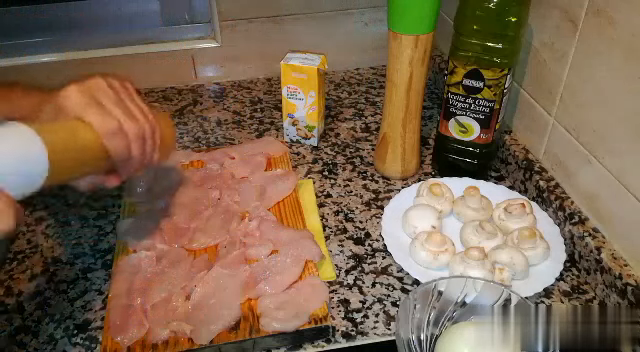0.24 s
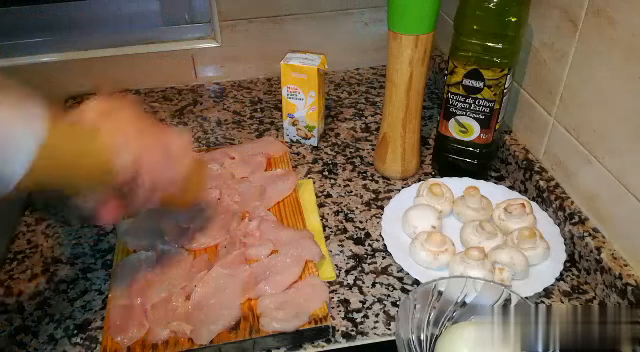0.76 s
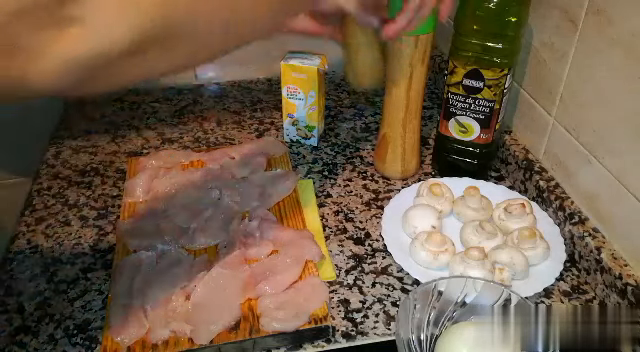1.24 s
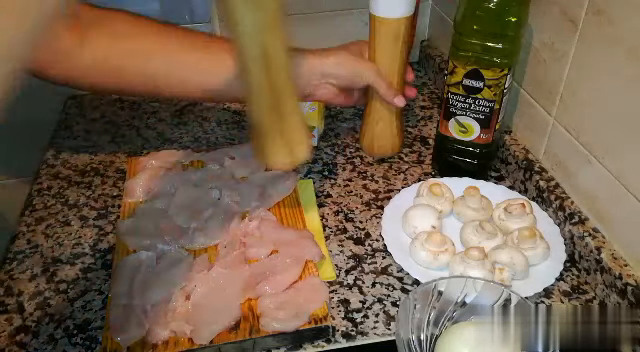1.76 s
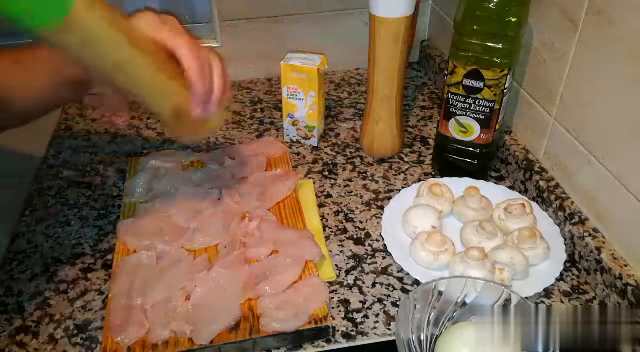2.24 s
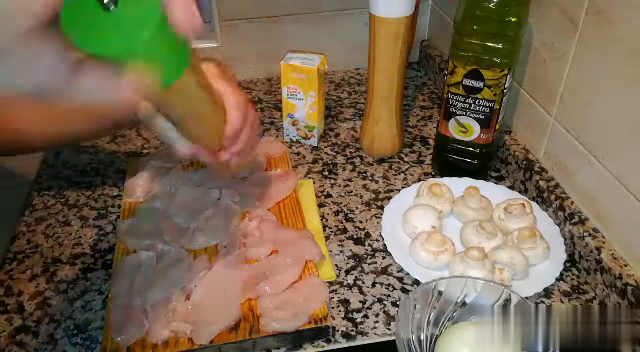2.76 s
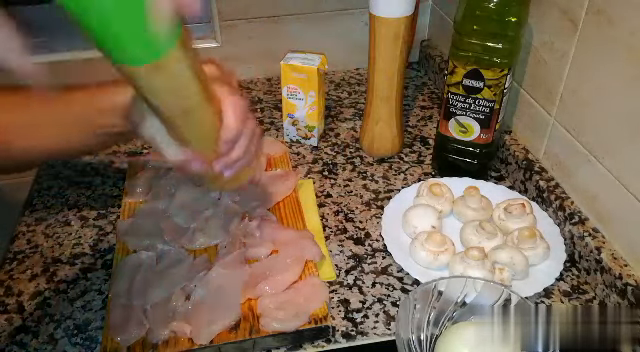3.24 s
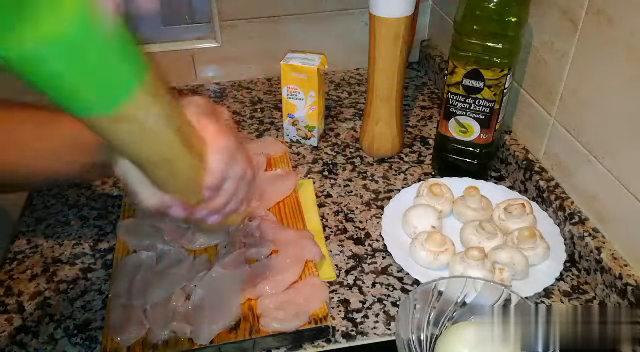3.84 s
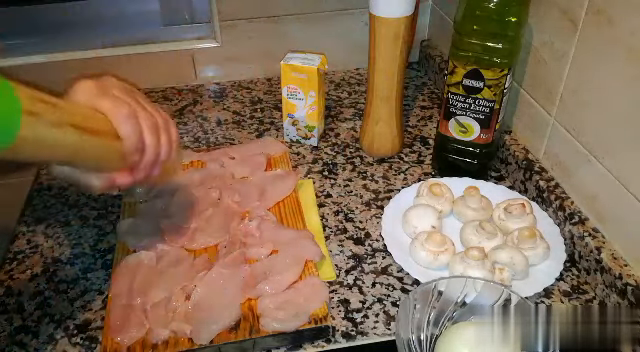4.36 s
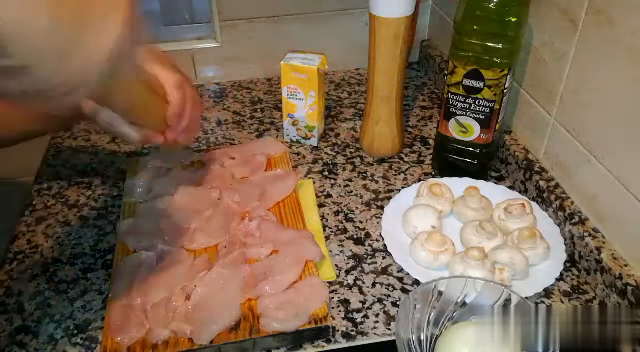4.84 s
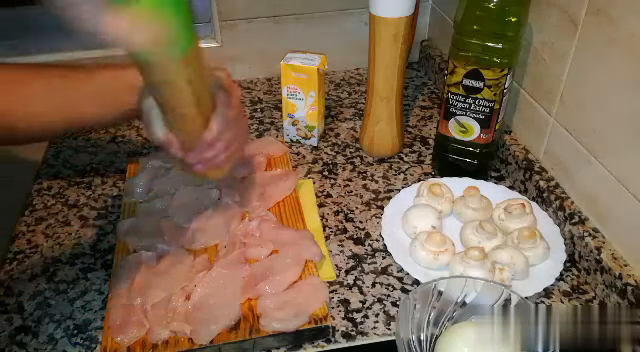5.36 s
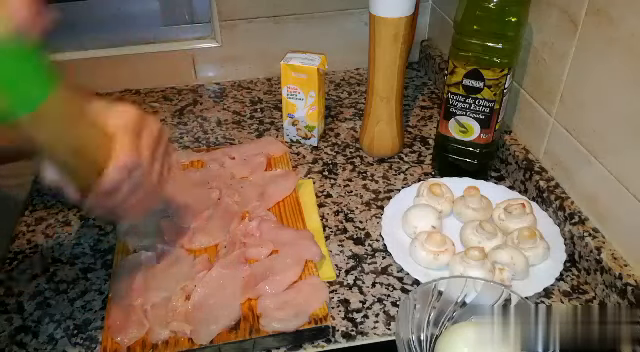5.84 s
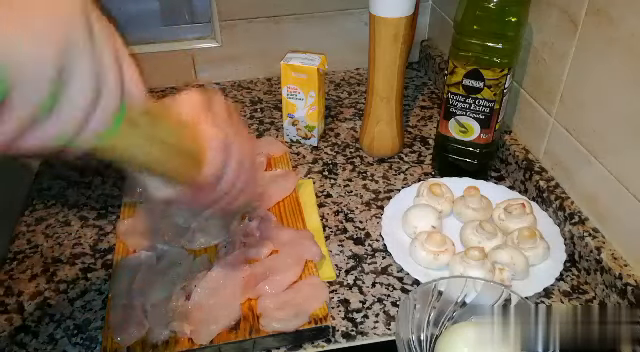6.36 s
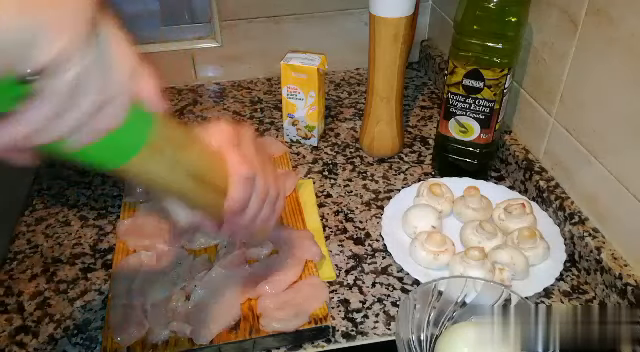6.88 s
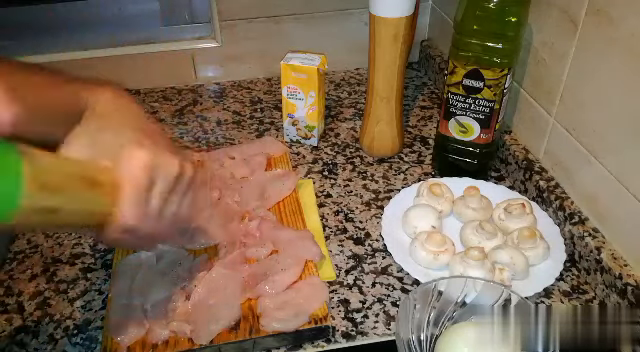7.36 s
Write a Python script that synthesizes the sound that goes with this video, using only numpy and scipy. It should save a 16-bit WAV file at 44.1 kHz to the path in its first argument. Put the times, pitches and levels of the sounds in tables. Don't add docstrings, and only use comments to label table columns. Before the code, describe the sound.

A small tiled kitchen recorded close by a phone, in stereo, with a very faint low refrigerator hum and quiet air. At 0.1 s a wooden salt mill makes a soft, fine crunch, with a weaker one at 0.3 s; from 0.53 to 0.7 s it turns back with sparse grains, a sharp woody crack and a slight ring. Quiet follows until 1.6 s, when its foot lands on stone with a loud, dull, quickly damped wooden knock and low shudder. Near 2.3 s a palm slides with a tiny hiss, then the pepper mill crunches strongly until 2.6 s. A weak twist at 3.0 s precedes brittle bursts around 3.45, 3.6, 4.0, 4.7, 5.1, 5.5, 5.9 and 6.35 s, the strongest around 5 to 6 s. Loose cap clicks and dry rasps punctuate them, notably at 3.55, 4.15, 5.47 and 6.8 to 7.1 s. A final crunch begins at 7.5 s.

```python
import sys
import numpy as np
from scipy import signal
from scipy.fft import rfft, irfft, next_fast_len
from scipy.io import wavfile
from scipy.ndimage import uniform_filter1d, map_coordinates

SR = 44100
rng = np.random.default_rng(int(sys.argv[2]) if len(sys.argv) > 2 else 0)


def master_out(mix):
    frames = np.transpose(np.atleast_2d(mix))
    ceiling = np.clip(frames, -1, 1)
    pcm = np.round(ceiling * 32767).astype(np.int16)
    wavfile.write(sys.argv[1], SR, pcm)


def voltage_ratio(level):
    return 10 ** (np.asarray(level, float) / 20)


N = 335683


def unit(x):
    return x / np.sqrt(np.mean(x ** 2) + 1e-20)


def along(points, hz):
    f, v = np.transpose(points)
    return np.interp(np.log(hz + 1), np.log(f + 1), v)


def add(line, s, piece):
    spot = line[..., round(s * SR):][..., :piece.shape[-1]]
    spot += piece[..., :spot.shape[-1]]


def filtered(x, response):
    m = next_fast_len(x.shape[-1] + SR // 2)
    spectrum = rfft(x, m) * response(np.fft.rfftfreq(m, 1 / SR))
    return irfft(spectrum, m)[..., :x.shape[-1]]


def ringing(x, body, order):
    def shape(f):
        total = 0
        for k, (center_hz, width_hz, db) in enumerate(body):
            damping = 1j * f * width_hz
            mode = damping / (center_hz * center_hz - f * f + damping)
            total = total + (-1) ** k * voltage_ratio(db) * mode ** order
        return total

    power = np.mean(np.abs(shape(np.linspace(1, SR / 2, 4000))) ** 2)
    return filtered(x, shape) / np.sqrt(power)


# frequency in Hz, level in dB rms.
HUM = [(50, -88), (100, -79.5), (120, -77.5), (185, -84), (15353, -103.5)]
# frequency in Hz, level in dB per Hz.
AIR = [(15, -53), (25, -12.5), (64, -20), (107, 0.5), (148, -20), (857, -19), (4210, -29.5), (15800, -51.5)]
# frequency in Hz, left-right likeness (1 = same).
ALIKE = [(60, 0.92), (180, 0.95), (550, 0.19), (1650, 0.077), (4970, 0.41), (15000, -0.12)]


def fridge():
    air_db = -71
    t = np.arange(N) / SR

    def sway(rate_hz):
        return map_coordinates(rng.standard_normal(int(N * rate_hz / SR) + 4), [t * rate_hz])

    lines = np.zeros(N)
    for hz, db in HUM:
        lines += voltage_ratio(db + 3 + 2.2 * sway(7)) * np.sin(2 * np.pi * hz * t + .7 * sway(6))

    def mid_side(hz):
        turn = np.arccos(np.clip(along(ALIKE, hz), -1, 1)) / 2
        return voltage_ratio(along(AIR, hz)) * np.array([np.cos(turn), np.sin(turn)])

    mid, side = filtered(rng.standard_normal((2, N)), mid_side)
    air = np.array([mid + side, mid - side])
    above_bass = filtered(air, lambda hz: hz > 250)
    return lines + voltage_ratio(air_db + 1.4 * sway(4.5)) * air / np.std(above_bass)


# frequency in Hz, level in dB per Hz.
FIZZ = [(5000, -46), (7500, 0), (9000, 1.5), (12000, -4), (15400, -10.5), (16000, -32.5), (16500, -73)]


def sparkle(x):
    return filtered(x, lambda hz: voltage_ratio(along(FIZZ, hz) + 6.5))


BITE_S = [.009, .022, .03, .016]


def strokes(twists, layers):
    usual_db, climb_db, fade_db, fade_bend, let_go = -30, 15.5, 23, 1.44, 1.25
    power = np.zeros((4, N))
    over_db, per_effort, per_slip = np.transpose(layers)[..., None]
    for s, climb_s, fade_s, peak_db, slip_db in twists:
        t = np.arange(round((climb_s + let_go * fade_s) * SR)) / SR
        climb = climb_db * np.clip(1 - t / climb_s, 0, 1)
        sag = fade_db * np.clip((t - climb_s) / fade_s, 0, None) ** fade_bend
        effort_db = peak_db - climb - sag
        level_db = usual_db + over_db + per_effort * (effort_db - usual_db) + per_slip * slip_db
        bite = np.clip(t / np.c_[BITE_S], 0, 1) ** 2
        add(power, s, (voltage_ratio(level_db) * bite) ** 2)
    return np.sqrt(power)


def grit(per_s, spread_db, life_s):
    chance, size = rng.random((2, N))
    size_db = -spread_db * np.log(size + 1e-9).clip(-3.2)
    starts = (chance < per_s / SR) * voltage_ratio(size_db)
    return unit(signal.lfilter([1], [1, -voltage_ratio(-60 / (life_s * SR))], starts))


# frequency in Hz, width in Hz, level in dB.
HANDLE = [(120, 67, -7.5), (200, 110, -9), (320, 80, -2), (408, 62, 0), (513, 71, 3), (650, 160, -0.5)]


def mill(twists, layers, cracks, body, burr, per_s, spread_db, life_s, rasp_db):
    rasp_db_per_octave = 7
    crush, rasp, fizz, knock = strokes(twists, layers) * grit(per_s, spread_db, life_s)
    own, kick = np.zeros((2, N))
    t = np.arange(SR // 25) / SR
    give = 1 - np.exp(-(t / .0012) ** 2)
    for s, db, hz in cracks:
        burr_db = db + rasp_db + rasp_db_per_octave * np.log2(hz / 2000)
        note = np.sin(2 * np.pi * hz * t)
        add(crush, s, give * voltage_ratio(db + 1.5 - 60 * t / 0.0073))
        add(kick, s + .0012, voltage_ratio(db - 3.0) * np.array([1, -1]))
        add(rasp, s, give * voltage_ratio(burr_db - 60 * t / 0.012))
        add(own, s, give * voltage_ratio(db + 2.5 - 60 * t / 0.012) * note)
    crush, rasp, fizz, knock = [crush, rasp, fizz, knock] * rng.standard_normal((4, N))
    wood = own + ringing(crush + kick, body, order=2)
    wood = filtered(wood, lambda f: 1 / (1 + 1j * f / 6000) ** 2)
    metal = filtered(ringing(rasp, burr, order=2), lambda f: 1 / (1 + 1j * f / 11000) ** 2)
    return wood + metal + sparkle(fizz) + ringing(knock, HANDLE, order=2)


# start in s, climb in s, fade in s, peak effort in dB,
# slip in dB (burrs rubbing with little to crush).
SALT_TWISTS = [
    (.096, 0.062, 0.099, -33, -0.6),
    (.308, 0.013, 0.063, -46.5, -4),
]
# dB over usual effort, dB per dB of effort, dB per dB of slip.
SALT_LAYERS = [
    (2.55, 1.01, 0),
    (-5, 0.95, 1.32),
    (-18, 0.88, 1.4),
    (-18.5, 1.1, -2),
]
# start in s, peak in dB, pitch in Hz.
SALT_CRACKS = [(0.108, -37.5, 3040), (0.128, -23, 1650), (0.138, -48.5, 3100), (0.169, -34, 3020),
               (0.189, -43, 2640), (0.209, -48, 2140), (0.344, -33, 1810)]
# frequency in Hz, width in Hz, level in dB.
SALT_BODY = [(1390, 1200, -3), (2245, 470, 4.5), (2960, 1020, 3), (4460, 1200, -2)]
# frequency in Hz, width in Hz, level in dB.
SALT_BURR = [(3880, 1700, 0.5), (5030, 4100, -1.5), (6430, 2200, 3), (7350, 1700, -30)]


def salt_mill():
    return mill(SALT_TWISTS, SALT_LAYERS, SALT_CRACKS, SALT_BODY, SALT_BURR,
                per_s=1900.0, spread_db=1.5, life_s=.03, rasp_db=-20)


# start in s, peak in dB, t60 in s, sparkle in dB over peak.
CAP_CLICKS = [(0.3132, -44, 0.042, -18), (3.537, -24, 0.015, -14), (3.5555, -14.5, 0.013, -18),
              (3.6635, -28, 0.027, -48), (4.1421, -12, 0.021, -14), (4.188, -15.5, 0.024, -11.5),
              (4.2883, -27.5, 0.02, -18), (5.4709, -9.5, 0.011, -21), (6.6671, -62, 0.022, -19.5),
              (6.788, -58, 0.024, -34), (6.8246, -20, 0.0064, -44), (6.846, -18.5, 0.007, -18),
              (6.9339, -24, 0.024, -19), (7.068, -20.5, 0.013, -29)]
# frequency in Hz, width in Hz, level in dB.
CAP = [(1810, 940, -1), (3090, 480, 3.5), (4600, 890, -1.5), (5320, 1600, -1.5), (6900, 1300, -5.5)]


def cap():
    blows = np.zeros((2, N))
    t = np.arange(SR // 20) / SR
    for s, db, t60_s, top_db in CAP_CLICKS:
        peaks_db = np.array([[db - 1.5], [db + top_db - 2]])
        add(blows, s, voltage_ratio(peaks_db - 60 * t / np.clip(t60_s, .003, .08)))
    low, high = blows * rng.standard_normal((2, N))
    return ringing(low, CAP, order=1) + sparkle(high)


# start in s, climb in s, fade in s, peak effort in dB, slip in dB.
SALT_RETURN = [
    (.53, 0.071, 0.032, -40.5, 5),
    (.606, 0.0066, 0.072, -35.5, -2.5),
]
# start in s, peak in dB, pitch in Hz.
RETURN_CRACKS = [(0.527, -41, 1160), (0.556, -26, 2700), (0.561, -24, 1100), (0.617, -12.5, 1604),
                 (0.651, -29, 1710)]
# frequency in Hz, width in Hz, level in dB.
RETURN_BODY = [(890, 230, 2.5), (1330, 200, -1.5), (1740, 120, 7.5), (2310, 1400, -0.5), (3220, 890, -5.5)]


def salt_return():
    return mill(SALT_RETURN, SALT_LAYERS, RETURN_CRACKS, RETURN_BODY, SALT_BURR,
                per_s=1700.0, spread_db=5.0, life_s=0.0035, rasp_db=-11)


def swells(table):
    out = np.zeros(N)
    t = np.arange(SR // 2) / SR
    for s, hz, db, rise_s, t60_s in table:
        rise = 1 - np.exp(-(t / rise_s) ** 2)
        add(out, s, voltage_ratio(db + 8.5 - 60 * t / t60_s) * rise * np.sin(2 * np.pi * hz * t))
    return out


# start in s, frequency in Hz, level in dB, rise in s, t60 in s.
SHAFT = [
    (.558, 890, -45.5, 0.0027, 0.07),
    (.62, 890, -47, 0.013, 0.25),
    (.635, 1785, -45, .012, 0.27),
]


def shaft():
    return swells(SHAFT)


# start in s, frequency in Hz, level in dB, rise in s, t60 in s.
BOOMS = [(1.286, 127, -58.5, .02, 0.33), (1.611, 119.8, -26.5, .03, 0.21), (1.62, 203.3, -37.5, .03, 0.27),
         (1.62, 320, -44, .03, 0.16), (3.01, 333, -60, .03, 0.23), (3.53, 274, -45.5, 0.035, 0.23),
         (3.55, 188, -43, .04, 0.14), (5.101, 109, -51.5, .04, 0.33), (5.5, 195, -40.5, .04, 0.21),
         (6.001, 120, -41.5, .03, 0.2), (6.34, 190.7, -29, .04, 0.19), (6.421, 120, -56, .03, 0.093),
         (7.081, 200, -38.5, .04, 0.17)]


def counter_booms():
    return swells(BOOMS)


# start in s, level in dB.
SET_DOWN = (1.6095, -2.1)
# frequency in Hz, level in dB, t60 in s.
FOOT = [(449, -16, 0.24), (726, -22.5, 0.26), (826, 8.5, 0.24), (937, 8, 0.19), (1116, 7, 0.57),
        (1420, 15.5, 0.092), (1584, -20, 0.19), (1800, -42, 0.4), (2600, -51, 0.32)]


def set_down():
    out = np.zeros(N)
    t = np.arange(SR // 2) / SR
    ring = np.zeros(len(t))
    for hz, db, t60_s in FOOT:
        ring += voltage_ratio(db - 60 * t / (0.039 * t60_s)) * np.sin(2 * np.pi * hz * t)

    def dull(f):
        return 1j * f / (80 + 1j * f) / (1 + 1j * f / 900) / (1 + 1j * f / 4500) ** 4

    grains = rng.standard_normal(len(t))
    crack = filtered(voltage_ratio(15.5 - 60 * t / 0.027) * grains, dull)
    crack = crack + sparkle(voltage_ratio(-33 - 60 * t / .012) * grains)
    shake = voltage_ratio(-27.0 - 60 * t / 0.46) * rng.standard_normal(len(t))
    shudder = ringing(shake, [(220, 360, 0), (416, 140, -2)], order=2)
    start_s, blow_db = SET_DOWN
    contact = 1 - np.exp(-t / 0.0031)
    add(out, start_s, voltage_ratio(blow_db - 8.5) * (ring + crack + shudder) * contact)
    return out


# time in s, level in dB.
SLIDE = [
    (2.24, -93.5),
    (2.309, -72),
    (2.37, -76.5),
]


def palm():
    t = np.arange(N) / SR
    s, db = np.transpose(SLIDE)
    rub = voltage_ratio(np.interp(t, s, db, -200, -200)) * rng.standard_normal(N)
    return ringing(rub, [(5565, 1500, 0)], order=2)


# start in s, climb in s, fade in s, peak effort in dB, slip in dB.
PEPPER_TWISTS = [(2.358, 0.08, 0.16, -25.5, -1.5), (2.864, 0.01, .04, -60, -5),
                 (2.89, 0.13, 0.095, -45.5, 1), (3.418, 0.054, 0.051, -23.5, -3.5),
                 (3.535, .03, .03, -28, 5), (3.578, 0.013, 0.1, -28, -3.5),
                 (4.003, 0.0091, 0.037, -29.5, -5), (4.15, .005, 0.025, -43.5, 8),
                 (4.225, .03, 0.096, -44, 8.5), (4.648, 0.0094, 0.15, -42.5, 7),
                 (4.72, 0.046, 0.029, -30.5, -3.5), (5.044, 0.054, 0.11, -19.5, 0.5),
                 (5.45, 0.044, 0.042, -22, 4), (5.52, 0.027, 0.068, -21.5, -3),
                 (5.874, 0.036, 0.058, -22, 3), (5.975, .009, .04, -18.5, 1.5),
                 (6.29, 0.025, 0.048, -41.5, 3), (6.325, 0.024, 0.095, -19.5, -4),
                 (6.37, 0.047, .06, -22, -0.5), (6.75, 0.039, 0.037, -59.5, 3),
                 (6.815, 0.022, 0.021, -42, 8.5), (6.94, .076, 0.16, -49, 10.5),
                 (7.04, .074, 0.012, -35, -5.5), (7.512, 0.027, .3, -20.5, 1)]
# dB over usual effort, dB per dB of effort, dB per dB of slip.
PEPPER_LAYERS = [
    (0.03, 0.93, 0.034),
    (-13, .7, .99),
    (-28.5, 0.69, 0.89),
    (-15.5, 0.73, -0.37),
]
# start in s, peak in dB, pitch in Hz.
PEPPER_CRACKS = [(2.511, -13.5, 1480), (2.416, -10, 3070), (2.43, -13, 1490), (2.458, -7.5, 2950),
                 (2.496, -7, 2050), (3.008, -21, 1060), (3.454, -6, 1116), (3.596, -9.5, 1167),
                 (3.608, -11, 1473), (4.016, -11.5, 1323), (2.899, -41, 3280), (4.683, -19.5, 1390),
                 (4.767, -18, 1020), (5.083, -16, 1880), (5.1, -11, 1500), (5.123, -0.5, 2910),
                 (5.456, -20, 1390), (5.483, -9.5, 2043), (5.549, -8, 1226), (4.319, -27, 1050),
                 (5.902, -4.5, 2680), (5.916, -2.5, 2650), (5.983, -7, 2280), (6.308, -17.5, 1220),
                 (6.339, -7, 1253), (6.424, -11, 2970), (7.109, -21.5, 1105), (7.53, -26.5, 1290),
                 (7.559, -7.5, 2300), (7.599, -5.5, 2040)]
# frequency in Hz, width in Hz, level in dB.
PEPPER_BODY = [(824, 320, -6.5), (1290, 680, -2.5), (1650, 760, -1.5), (2050, 1000, -0.5), (2700, 120, -2),
               (2940, 420, -1)]
# frequency in Hz, width in Hz, level in dB.
BURR = [(3900, 860, -3), (4540, 530, -6), (5610, 1100, 5), (7350, 1600, -9)]


def pepper_mill():
    return mill(PEPPER_TWISTS, PEPPER_LAYERS, PEPPER_CRACKS, PEPPER_BODY, BURR,
                per_s=1500., spread_db=5.5, life_s=.004, rasp_db=-18.5)


# frequency in Hz, t60 in s.
TILES = [(120, 0.41), (400, 0.073), (1000, 0.27), (3000, 0.26), (8000, 0.22), (14000, 0.068)]


def kitchen(x):
    step = SR // 8
    wet = np.zeros((2, N))
    for start in range(0, N, step):
        hz, t, z = signal.stft(rng.standard_normal((2, SR // 3)), SR, nperseg=128)
        close = voltage_ratio(8.0 - 60 * t / 0.015)
        tiles = voltage_ratio(-60 * t / along(TILES, hz)[:, None])
        tail = signal.istft(z * (close + tiles), SR, nperseg=128)[1]
        tail = tail / np.linalg.norm(tail[0])
        add(wet, (start + 30) / SR, signal.fftconvolve(x[None, start:start + step], tail, axes=1))
    side = filtered((wet[0] - wet[1]) / 2, lambda f: f ** 2 / (f ** 2 + 220 ** 2))
    return wet.mean(0) + side * [[1], [-1]]


# frequency in Hz, left minus right in dB.
LEAN = [(300, 1), (700, -1), (1400, 0.5), (5000, 3.5), (9000, -2)]


def scene():
    near = salt_mill() + cap() + salt_return() + set_down() + palm() + pepper_mill()
    lag_s = 3.5 / SR
    ears = np.array([[1], [-1]])
    direct = filtered(near, lambda hz: np.exp(-1j * np.pi * hz * lag_s * ears))
    heard = voltage_ratio(-5.5) * direct + voltage_ratio(1.0) * kitchen(near) + shaft() + counter_booms()
    return filtered(heard, lambda hz: voltage_ratio(along(LEAN, hz) / 2 * ears)) + fridge()


# frequency in Hz, dB under the whole at which a band is dropped.
TREBLE_BANDS = [(7000, -52.5), (9000, -47), (11500, -44), (13000, -44), (15500, -46)]
# start in s, end in s, low edge in Hz, top edge in Hz.
BASS_GAPS = [(.11, .17, -9, 294), (0.559, .7, 150, 400), (0.566, 0.654, 2, 150), (4.22, 4.3, 170, 622),
             (6.964, 7.04, 248, 650)]


def thinned(dry):
    top_hz, band_hz = 16300, 345
    follows, middling_db, waver_db = .9, -38, 4
    quiet_db = -108.5
    hz, t, z = signal.stft(dry, SR, nperseg=1024)
    power = np.mean(np.abs(z) ** 2, 0)
    keep = np.ones(z.shape[1:])
    whole = uniform_filter1d(power.sum(0), size=3) / voltage_ratio(2 * middling_db)
    for low_hz in np.arange(6900, top_hz, band_hz):
        band = (hz >= low_hz) & (hz < low_hz + band_hz)
        limit = voltage_ratio(2 * (middling_db + along(TREBLE_BANDS, low_hz))) * np.abs(whole) ** follows
        limit = limit + voltage_ratio(2 * quiet_db)
        waver = unit(uniform_filter1d(rng.standard_normal(len(t)), size=2))
        faint = power[band].sum(0) < limit * voltage_ratio(2 * waver_db * waver)
        keep[np.ix_(band, faint)] = voltage_ratio(-29.5)
    for start_s, end_s, low_hz, high_hz in BASS_GAPS:
        band = (hz >= low_hz) & (hz < high_hz)
        keep[np.ix_(band, (t > start_s) & (t < end_s))] = voltage_ratio(-51.5)
    return signal.istft(z * keep * (hz < top_hz)[:, None], SR, nperseg=1024)[1][:, :N]


def roll_off(x):
    return signal.sosfilt(signal.butter(12, 16650, fs=SR, output="sos"), x)


def record(dry):
    mix = thinned(dry)
    return roll_off(mix)


dry = scene()
out = record(dry)
master_out(out)
```